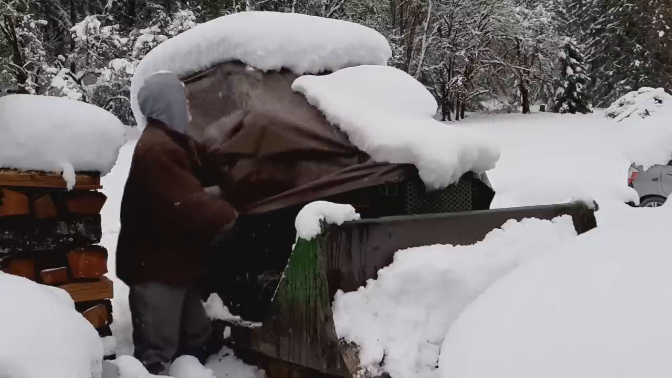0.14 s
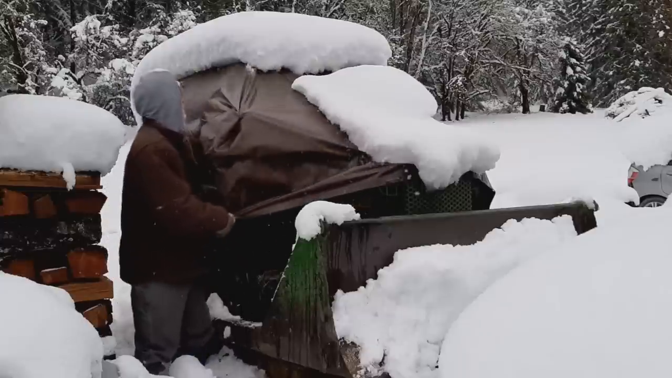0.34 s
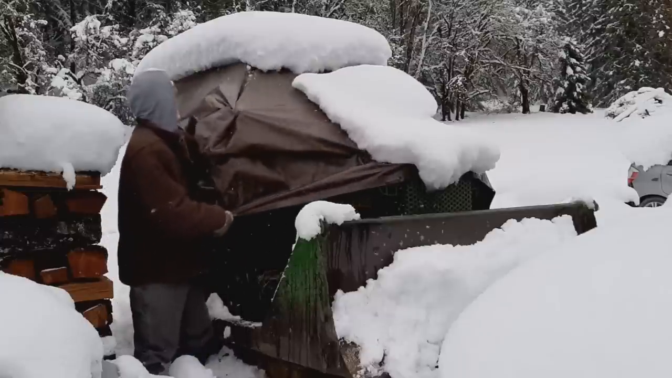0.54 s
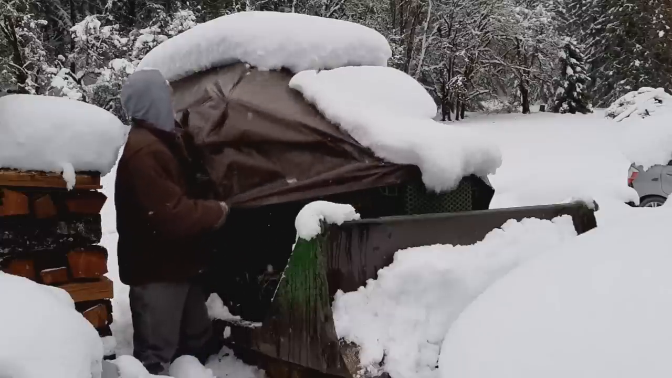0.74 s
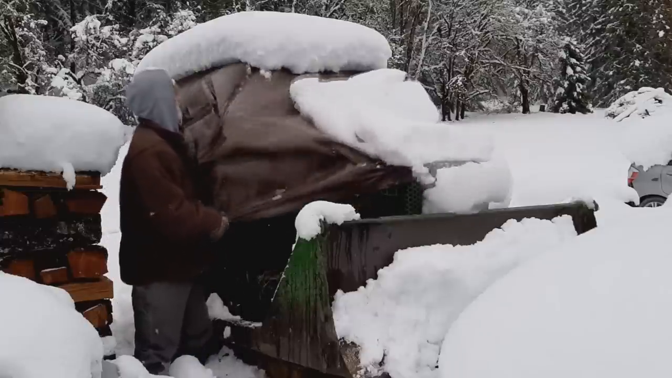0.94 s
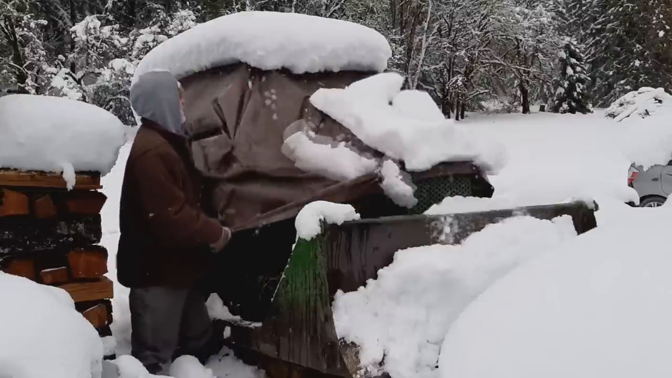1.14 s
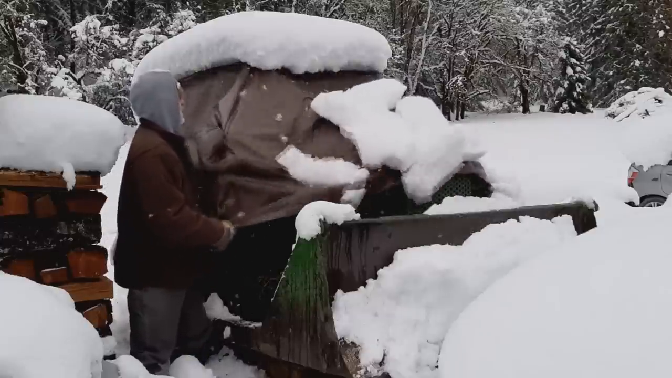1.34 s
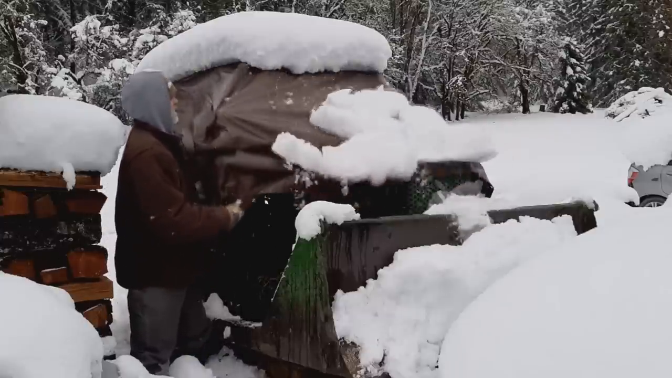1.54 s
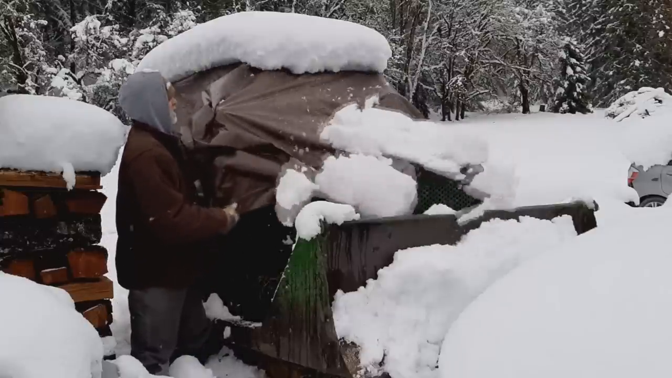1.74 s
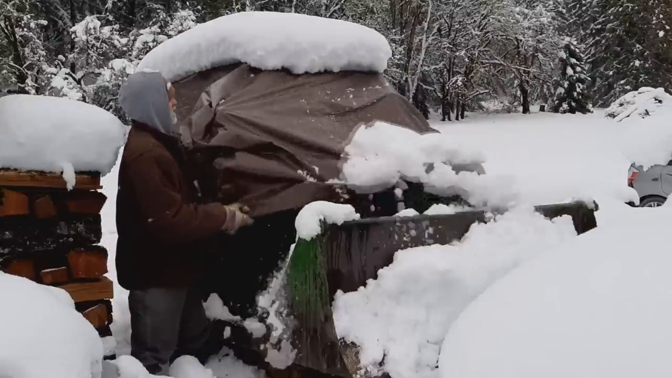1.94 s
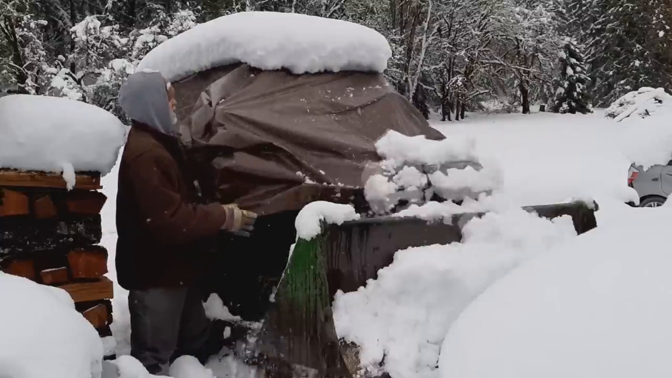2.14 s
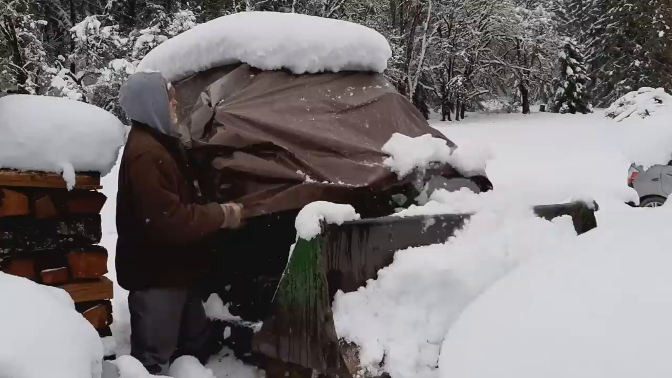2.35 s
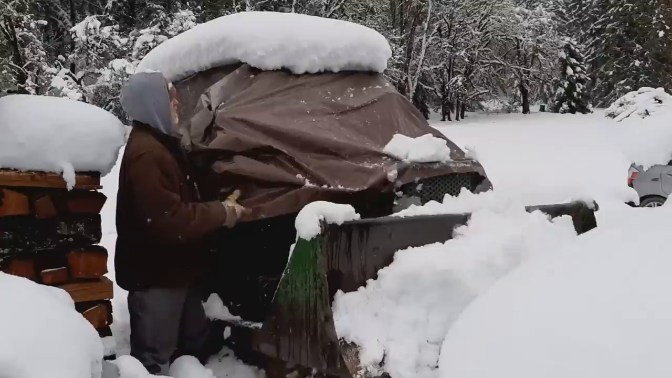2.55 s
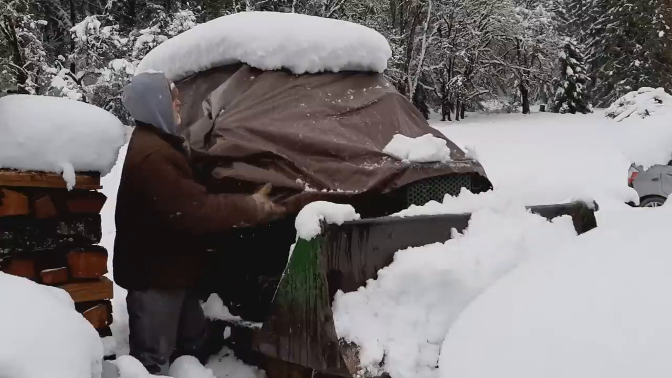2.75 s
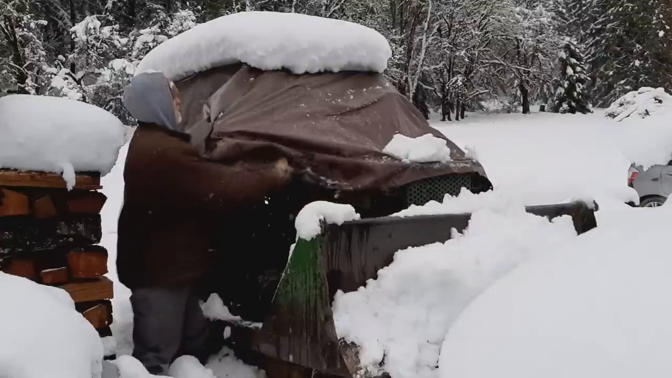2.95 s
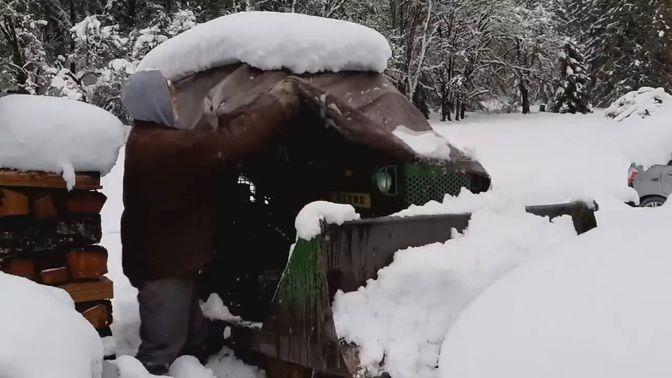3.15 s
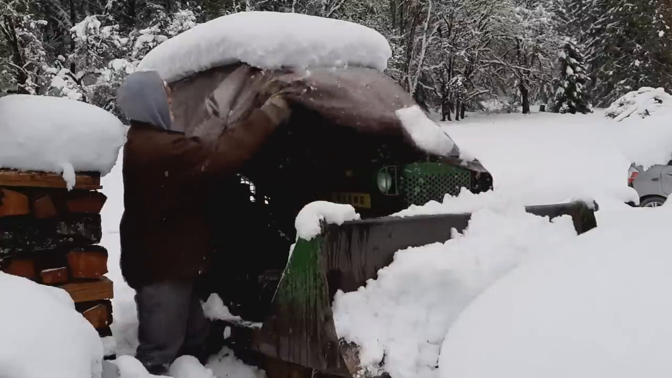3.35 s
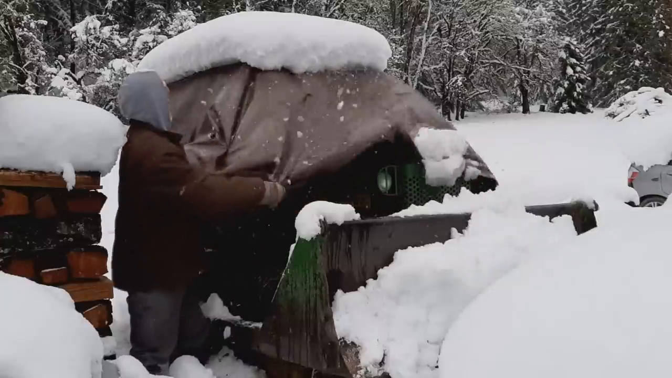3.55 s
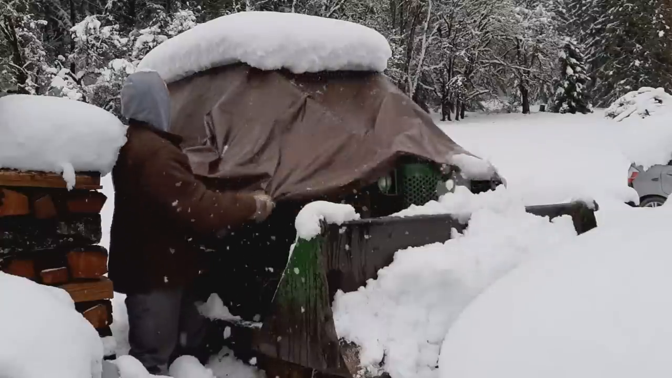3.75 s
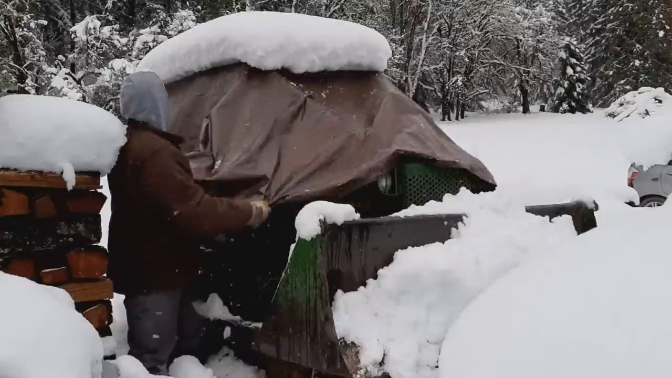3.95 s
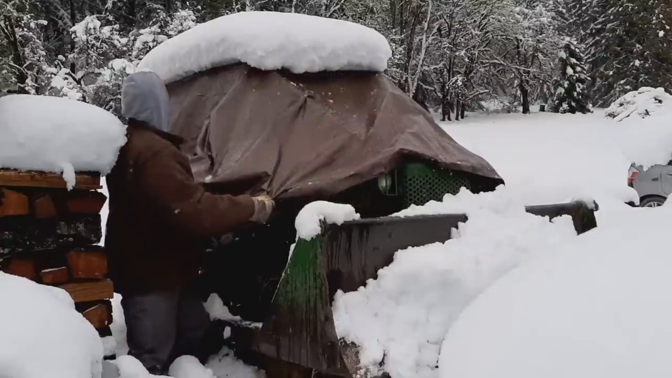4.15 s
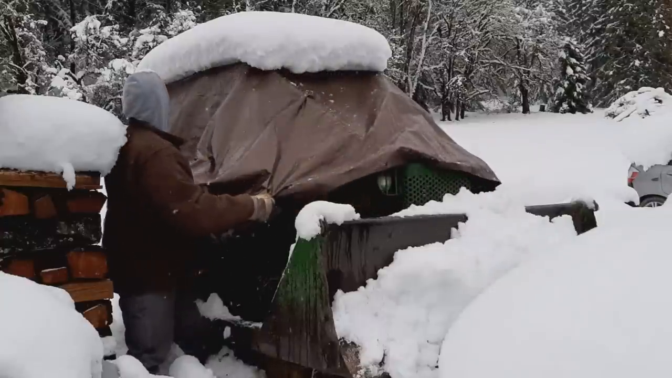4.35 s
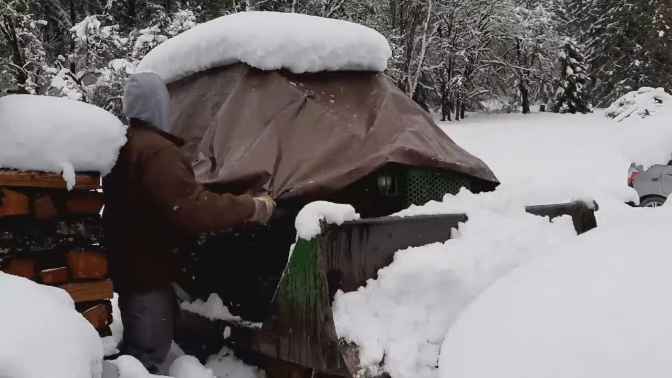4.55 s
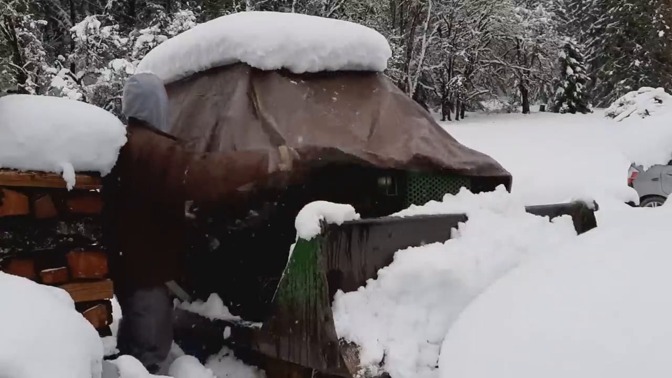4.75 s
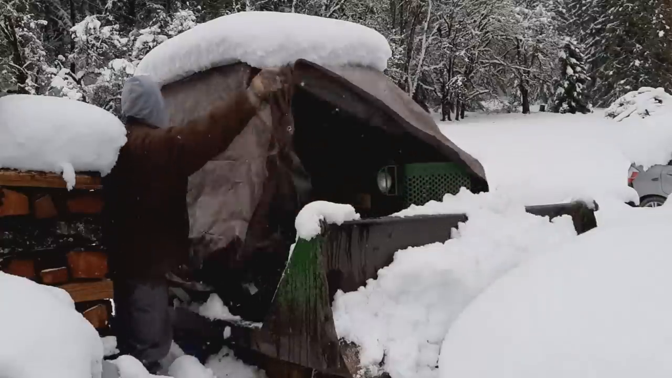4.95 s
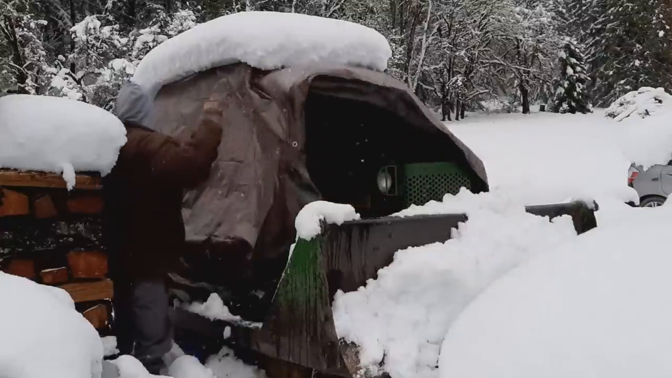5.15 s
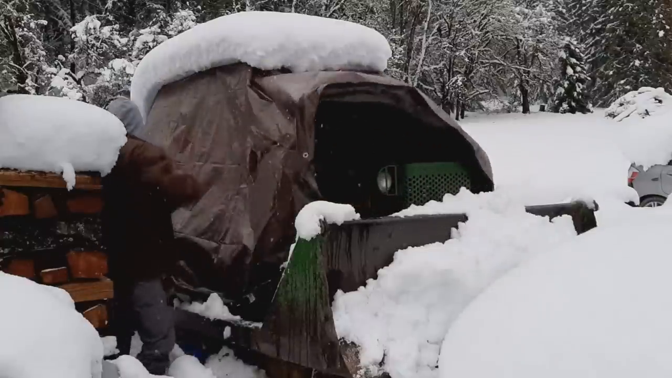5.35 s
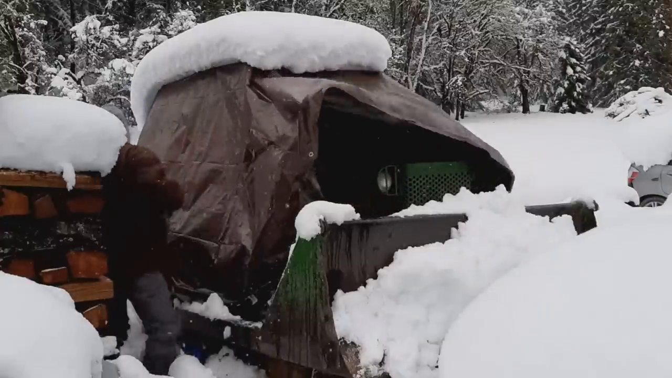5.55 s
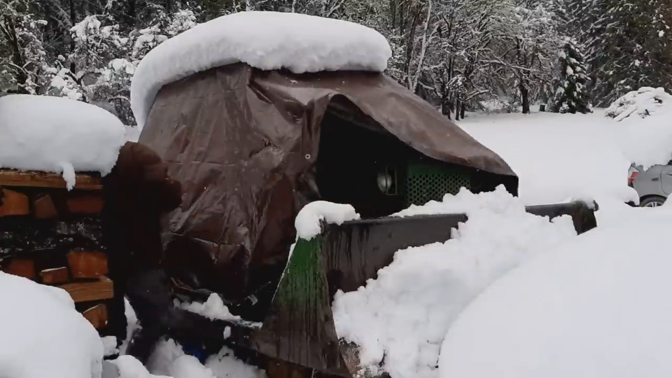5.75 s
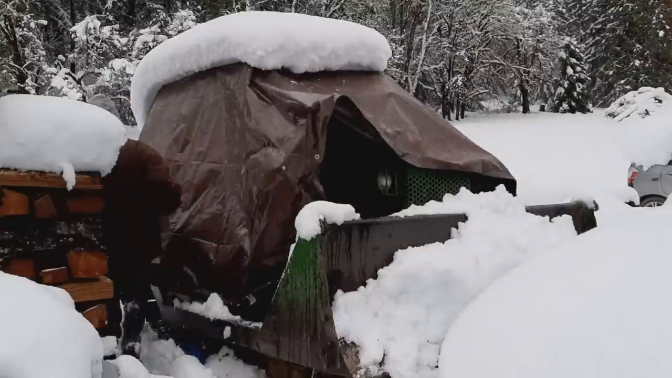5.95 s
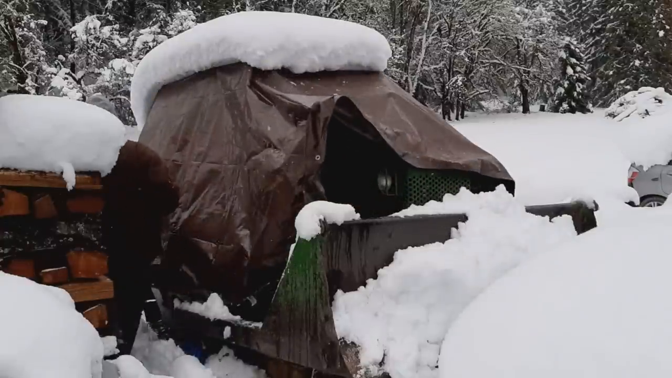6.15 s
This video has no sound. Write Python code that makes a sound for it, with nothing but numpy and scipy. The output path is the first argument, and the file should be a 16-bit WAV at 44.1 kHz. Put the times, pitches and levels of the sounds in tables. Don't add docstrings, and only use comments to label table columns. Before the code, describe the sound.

Outdoors in a hushed, snow-deadened yard, a stiff plastic tarp is handled close to a stereo microphone. From 0 to 0.4 seconds, strong tugs make dense, rough crinkling with bright snaps and low puffs of air. It dips briefly around 0.5 to 0.75, then a sudden pull starts a sustained rustle with uneven surges and hissing, sliding snow until about 1.7. This thins to slack ticks and a soft slump, nearly silent from 2.4 to 2.7, with small crinkles after. At 3.0 the pulling returns: big folds flap and billow with low air thumps, peaking near 3.7 in a loud, deep pop. Rustling loosens, with a sharp pop at 4.0, and fades by 4.6. A fresh drag bursts in around 4.8 to 5.1, then decays; soft snow lumps land faintly near 5.6 and sparse, quiet crinkles continue to the end, just past 6 seconds.

```python
import sys
import numpy as np
from scipy import signal
from scipy.fft import rfft, irfft, next_fast_len
from scipy.io import wavfile
from scipy.ndimage import uniform_filter1d

SR = 44100
rng = np.random.default_rng(int(sys.argv[2]) if len(sys.argv) > 2 else 0)


def ratio(d):
    e = np.asarray(d, float) / 20
    return 10 ** e


def digitize_waveform(pressure):
    field = np.atleast_2d(pressure).T
    bounded = np.clip(field, -1, 1)
    quanta = np.round(bounded * 32767).astype(np.int16)
    wavfile.write(sys.argv[1], SR, quanta)


N = 272967


def evened(x):
    return x / np.sqrt(np.mean(x ** 2) + 1e-20)


def read_spectrum(points, hz):
    f, value = np.transpose(points)
    return np.interp(np.log(hz + 1), np.log(f + 1), value)


# frequency in Hz, density in dB per Hz.
COLOUR = [(28, -55), (45, -13.5), (64, -10), (127, -4.5), (189, -9.5), (600, -4), (1500, -3.5), (2260, -5),
          (3650, -5.5), (7600, -11.5), (8350, -24.5), (8750, -26.5), (11600, -21.5), (16000, -23)]
EDGE_HZ = 16020


def band(lo_hz, hi_hz):
    hz = abs(np.fft.fftfreq(8192, 1 / SR)) + 1
    slope = (1 + (lo_hz / hz) ** 6) * (1 + (hz / hi_hz) ** 6) * (1 + (hz / EDGE_HZ) ** 200)
    log_gain = np.log(ratio(read_spectrum(COLOUR, hz)) / np.sqrt(slope) + 1e-5)
    spectrum = np.exp(np.conj(signal.hilbert(log_gain)))
    taps = np.fft.ifft(spectrum).real[:4096]
    return taps / np.linalg.norm(taps)


def through_band(x, lo_hz, hi_hz):
    return signal.oaconvolve(x, band(lo_hz, hi_hz)[None])[:, :N]


LAG, LAG_SPREAD = 1.7, 2.9


def clicks(at, size, jitter):
    lag = np.round(LAG + LAG_SPREAD * jitter).astype(int)
    ports = [np.bincount(np.clip(place, 0, N - 1), size, N) for place in (at, at + lag)]
    return evened(np.array(ports))


def friction():
    return clicks(np.arange(N), rng.standard_normal(N), rng.standard_normal(N))


AIR_DB = -82


def air():
    return ratio(AIR_DB) * through_band(friction(), 900, 15900)


def buckles(per_s, spread_db):
    place, sign, size, a, b = rng.random((80000, 5))[:round(per_s * N / SR)].T
    strength = ratio(spread_db * np.minimum(-np.log(1 - size), 5.0))
    jitter = np.sqrt(6) * (a + b - 1)
    return clicks((place * N).astype(int), np.sign(sign - .5) * strength, jitter)


# time in seconds, effort in dB, sliding snow in dB, billow of large panels in dB.
DRAG = [(0, -38.5, -3, -1.5), (.4, -38, 1.5, 1), (.47, -47.5, 3, 1), (.745, -53, 7.5, 1.5),
        (.77, -40.5, 5.5, 2), (1.6, -39, 4, -0.5), (2.1, -45, 7, 0.5), (2.39, -57.5, 9, 3),
        (2.46, -65, 11, -10), (2.66, -69.5, 13, -8), (2.95, -58.5, -3, -1), (3.2, -35, -9, 0),
        (3.8, -40, 5, -1), (4.3, -49, 7.5, -5.5), (4.66, -61.5, 5, -4.5), (4.832, -35, -3, -1),
        (5.52, -58.5, 4, -3.5), (6.19, -69, -5, -5)]
# peak time in seconds, effort in dB, rise in
# seconds per 10 dB, fall in seconds per 10 dB, tautness in dB.
MOVES = [(.105, -31.5, -0.15, 0.0155, 2.5), (0.261, -29, 0.18, 0.0348, -1), (.379, -41, 0.7, -0.11, 3.5),
         (.85, -44.5, -0.14, 0.21, 2.5), (.97, -47, 0.06, -0.01, -10), (1.122, -37, 0.04, 0.01, 1),
         (1.2, -42, 0.07, 0.01, 5), (1.287, -35, 0.11, 0.12, 0.5), (1.53, -33.5, -0.0847, 0.0744, 0.5),
         (3.01, -47.5, 0.05, 0.13, -1), (3.09, -34, 0.0345, -0.15, 0.5), (3.242, -31, 0.06, 0.1341, 4.5),
         (3.432, -33, 0.1456, -0.13, -0.5), (3.58, -32.5, 0.0566, 0.03, 9.5), (3.641, -37.5, 0.0644, 0, 7),
         (3.713, -23, 0.0471, 0.0143, -1), (3.76, -34.5, 0.03, 0.0928, -0.5),
         (3.118, -35, -0.0037, -0.5, -0.5), (4.951, -35.5, 0, 0.22, 1.5), (5.076, -36.5, -0.08, 0.0757, -14),
         (.53, -49, -0.5, 0.05, -1), (0.691, -44, 0.06, 0.04, 3.5), (2.078, -46, -0.1, 0.2, 1),
          (2.33, -61, -2, 0, 4), (2.5, -61, 0.26, 0.15, 8), (2.705, -57, -0.3, 0, -5),
          (2.96, -56, -0.1, -1, -4), (4.575, -62, .05, .03, 11), (2.764, -51, 0.08, 0.12, -4.5),
          (2.854, -54, -0.08, .06, -2), (4.011, -48.5, 0.16, 0.4, 4), (4.289, -44, -0.47, .06, -11),
          (4.391, -52.5, -0.7, 0.14, -9), (5.25, -47, 0.02, 0.17, -5.5), (5.47, -52.5, 0, 0, 0.5),
          (5.702, -52.5, 0.07, .12, -0.5), (5.8, -57.5, 0.08, .08, 0), (5.96, -55, .04, .04, 1),
          (6.03, -56, 0.16, -0.7, -4), (6.09, -51.5, .06, 0.15, 1.5), (6.13, -51, .04, -0.7, -5)]
# level in dB, then dB per dB of effort, of snow, of billow, of tautness.
FOLLOW = [
    (0, 1, -0.046, 0.053, 0.068),
    (-9, 0.9, -.1, 1.08, -0.46),
    (0, 1.0455, 0.24, 0, 1),
    (-8, 0.99, 0.99, 0.11, 1),
    (-22, 1.3, .05, 0.024, .1),
    (-13.5, 1.07, 0.28, 1.2, 0.013),
]
MIDDLE_DB = -40
ROUND_DB = 0.97


def follow():
    t = np.arange(0, N + 64, 64) / SR
    s, *drag = np.transpose(DRAG)
    effort, snow, billow = (np.interp(t, s, column) for column in drag)
    at, peak, rise, fall, taut = np.transpose(MOVES)[:, :, None]
    rising = (at - t) / np.maximum(rise, .005)
    falling = (t - at) / np.maximum(fall, .005)
    fade = 10 * np.where(t < at, rising, falling)
    fade = np.hypot(fade, ROUND_DB) - abs(ROUND_DB)
    levels = []
    for db, by_effort, by_snow, by_billow, by_taut in FOLLOW:
        steady = by_effort * (effort - MIDDLE_DB) + by_snow * snow
        tugs = by_effort * (peak - fade - MIDDLE_DB) + by_taut * taut
        total = 10 * np.log10(ratio(2 * steady) + ratio(2 * tugs).sum(0)) + by_billow * billow
        levels.append(np.interp(np.arange(N) / SR, t, MIDDLE_DB + db + total))
    return levels


# time in seconds, level in dB, length in seconds per 10 dB.
PUFFS = [(0.135, -47, 0.13), (0.235, -47, 0.07), (0.36, -49.5, 0.1), (0.672, -60, .04), (0.824, -52, 0.1),
         (0.93, -49, 0.07), (1.223, -50, 0.18), (1.417, -53, 0.2), (1.643, -49, 0.2), (2.1, -59, 0.12),
         (3.07, -65, .05), (3.23, -39, 0), (3.455, -43, -0.04), (3.548, -40, 0), (3.693, -41.5, 0.06),
         (3.84, -52, -0.12), (4.86, -54, -0.04), (4.974, -48.5, 0.1), (5.6, -55, .07), (6.1, -67, -0.9)]
RUMBLE_DB, PUFF_TOP_DB = -78, 0.5


def boom():
    t = np.arange(N) / SR
    puffs = ratio(2 * RUMBLE_DB)
    for s, db, length in PUFFS:
        puffs = puffs + ratio(2 * db - 20 * abs(t - s) / max(length, .01))
    deep, upper = follow()[-2:]
    deep_db = 10 * np.log10(ratio(2 * deep) + puffs)
    upper_db = 10 * np.log10(ratio(2 * upper) + puffs * ratio(2 * PUFF_TOP_DB))
    push = buckles(700, 2.2) + 0.055 * rng.standard_normal((2, N))
    deep_air = through_band(push * ratio(deep_db + 1.3), 42, 130)
    upper_air = through_band(push * ratio(upper_db + 0.5), 130, 270)
    return deep_air + upper_air


# start in seconds, frequency in Hz,
# peak level in dB, length in cycles.
THUDS = [
    (3.700, 66, -32, 2.6),
    (3.706, 190, -29, 2.4),
    (3.69, 520, -28, 2),
    (2.33, 300, -52, 3),
    (4.0091, 950, -24, 1.4),
    (5.551, 140, -54, 1.3),
    (5.565, 190, -52, 1.3),
    (5.575, 105, -52, 2.5),
    (5.63, 130, -55, 3),
]


def thuds():
    out = np.zeros(N)
    for s, hz, db, cycles in THUDS:
        turns = np.arange(0, cycles, hz / SR)
        swell = np.sin(np.pi * turns / cycles)
        at = round(s * SR)
        out[at:at + len(turns)] -= ratio(db) * np.sin(2 * np.pi * turns) * swell
    return out


CRACKLE_PER_S = 30
CRACKLE_DB, CRACKLE_SPREAD_DB = -8, 2.5
CRACKLE_TILT_DB, CRACKLE_NEEDLE_DB = -1.5, -11.5


def crackle():
    when, size, tone, top = rng.random((round(CRACKLE_PER_S * N / SR), 4)).T
    s = .01 + when * (N / SR - .02)
    pull_db = follow()[0][(s * SR).astype(int)]
    db = pull_db + CRACKLE_DB + CRACKLE_SPREAD_DB * np.minimum(-np.log(1 - size), 2)
    tilt_db = CRACKLE_TILT_DB + 12 * (tone - .5)
    needle_db = db + CRACKLE_NEEDLE_DB + 16 * (top - .5)
    return list(zip(s, db, tilt_db, needle_db))


# time in seconds, strength in dB,
# brightness in dB per octave, level of the needle in the top band in dB.
SNAPS = [(0.0852, -35, -4, -46), (0.0945, -33, 6, -42), (0.1062, -37, -2, -44), (.206, -49, 0, -46),
         (.2275, -38, -8, -49), (0.2596, -34, 1.5, -35), (.376, -42, 11, -35), (0.4062, -35.5, 1, -37),
         (0.7616, -35, -1, -33), (0.786, -33.5, 0, -46), (0.812, -35, 0, -50.5), (0.9967, -40, 9, -42.5),
         (1.1888, -42, 5, -53), (1.203, -54, 1.5, -60), (1.2371, -43, 8, -47), (1.296, -45, -5, -40.5),
         (3.005, -36, -2.5, -34), (3.0856, -45, -2, -44), (3.1358, -34.5, 2, -41), (3.1983, -36, 1, -52),
         (3.2635, -38, -1.5, -46), (3.5425, -32.5, -6.5, -58), (3.6621, -31, 4, -40), (3.667, -29, -3, -38),
         (4.7857, -38, -3, -65), (4.8434, -35, 0, -54), (4.913, -36, 1, -54), (5.044, -37, -5.5, -45),
         (5.0706, -32.5, 0, -55), (5.1354, -51, 2, -47),
         (.4779, -40.5, 0, -47), (.6869, -43.5, 4, -43.5), (.6949, -42, 2, -51), (1.6638, -40.5, -4, -52.5),
         (2.052, -45, 8, -38.5), (2.3163, -50.5, -2, -53), (2.5999, -61, 13.5, -44), (2.702, -51, -6, -78),
         (2.7475, -62, -5, -80), (2.7614, -55, 7, -44), (2.7818, -53, -4, -72), (2.821, -56, -1, -71),
         (2.9322, -55, 0, -76), (2.9654, -63, -12, -68), (2.9999, -42.5, 0, -49), (3.8676, -68, -4, -56),
         (4.0504, -46, 8, -52), (4.3221, -44, 0, -62), (4.3887, -44, -1, -44), (4.5613, -62, 18, -45),
         (4.6924, -55.5, -4, -75), (4.7064, -50, -1, -82), (4.7326, -55, -8, -74), (5.2115, -52, -3, -63),
         (5.3838, -50, 1, -55), (5.5344, -49, 4, -58), (5.5431, -53, -9, -69), (5.6032, -55, 7, -59),
         (5.725, -54.5, -5.5, -66), (6.0982, -52, 9.5, -71)]
# low edge in Hz, high edge in Hz, trim in dB.
SNAP_BANDS = [(700, 2500, 1.0), (2500, 5000, 1.5), (5000, 8200, 3.0), (8700, 15900, 6.0)]
CREASE_HZ = 3300


def snaps(fade_s=.001, lead=2.0):
    size = 512
    t, hz = np.arange(size) / SR, np.fft.rfftfreq(size, 1 / SR)
    creases = SNAPS + crackle()
    splinters = rng.standard_normal((len(creases), size)) * np.exp(-t / fade_s)
    splinters[:, 0] = lead * np.sign(splinters[:, 0])
    timing = np.exp(1j * np.angle(rfft(splinters)))
    octaves = np.log2([np.sqrt(lo * hi) / CREASE_HZ for lo, hi, _ in SNAP_BANDS[:-1]])
    out = np.zeros((2, N + 2 * size))
    for (s, peak_db, tilt_db, needle_db), phase in zip(creases, timing):
        levels = [*(peak_db + tilt_db * octaves), needle_db]
        colour = [(200, -120), (16100, -140)]
        for (lo, hi, trim_db), level_db in zip(SNAP_BANDS, levels):
            density_db = level_db + trim_db + 10 * np.log10(50 * SR / (hi - lo))
            colour += [(lo * 1.1, density_db), (hi / 1.05, density_db)]
        snap = np.roll(irfft(ratio(read_spectrum(sorted(colour), hz)) * phase), 64)
        for port in (0, 1):
            at = round(s * SR) - 60 + port * round(LAG)
            out[port, at:at + size] += snap
    return out[:, :N]


def clumps(per_s=70.0, fade_s=0.004, drift_s=0.01, pull_s=0.095):
    step = 32
    fire, size, noise = rng.random((3, N // step + 2))
    starts = size * (fire < per_s * step / SR)
    slides = signal.lfilter([1], [1, -np.exp(-step / (fade_s * SR))], starts)
    wander = uniform_filter1d(noise - .5, max(round(drift_s * SR / step), 1))
    both = evened(slides - slides.mean()) + 0.26 * evened(wander)
    both = both - uniform_filter1d(both, round(pull_s * SR / step))
    return np.interp(np.arange(N) / step, np.arange(len(both)), evened(both))


# low edge in Hz, high edge in Hz, buckles per second, size spread in dB,
# share of sheet-wide buckles from 0 to 1, clumping in dB, smooth friction from 0 to 1, trim in dB.
LAYERS = [
    (652, 3020, 5000, 2, 0.29, 1.24, 0.48, -0.11),
    (247, 830, 2500, 2, 0.44, 1.63, 0.24, 2),
    (2600, 8400, 9000, 1, 0.3, 1.7, 0.72, 0.2),
    (9260, 14100, 7000, 5.5, 0.5, 1.5, 0.71, 1.5),
]


def sheet():
    levels = follow()
    sparse = np.clip(1.1 - .015 * (levels[0] + 42), .9, 1.35)
    wide, avalanche, rub, out = buckles(3000, 2.0), clumps(), friction(), snaps()
    for (lo, hi, per_s, spread_db, share, clump_db, smooth, trim_db), db in zip(LAYERS, levels):
        share, smooth = np.clip([share, smooth], 0, 1)
        grains = share * wide + np.sqrt(1 - share ** 2) * buckles(per_s, spread_db)
        drive = np.sqrt(1 - smooth ** 2) * grains + smooth * rub
        bursts = 0.52 * avalanche + 0.5 * clumps()
        drive = evened(drive * ratio(clump_db * sparse * bursts))
        out = out + through_band(drive * ratio(db + trim_db), lo, hi)
    return out


def yard(x, wet_db=-12.0, fade_s=.009, turn_s=.35):
    t, wet = np.arange(2500) / SR, 0
    for k in range(6):
        taps = rng.standard_normal((2, len(t))) * np.exp(-t / fade_s) * (t > .001)
        taps = taps[0] + 0.53 * np.array([taps[1], -taps[1]])
        taps = taps / np.linalg.norm(taps[0])
        turn = (np.arange(N) / SR / turn_s * 6 - k) % 6 - 1
        window = np.cos(np.pi / 2 * np.clip(turn, -1, 1))
        wet = wet + signal.oaconvolve(x * window, taps, axes=1)[:, :N]
    return (x + ratio(wet_db) * wet) / np.sqrt(1 + ratio(2 * wet_db))


def scene():
    return yard(sheet()) + boom() + thuds() + air()


def band_limit(x):
    return signal.sosfilt(signal.butter(12, 16830, fs=SR, output="sos"), x)


# frequency in Hz, width in Hz, level in dB.
HOUSING = [(1535, 130, -4.0), (2035, 50, -3.0)]
# frequency in Hz, left-right difference in dB.
LEAN = [(60, 0), (240, -0.5), (950, 0), (3770, -1.5), (15000, 0.5)]


def record(dry):
    x = dry.copy()
    for hz, width_hz, db in HOUSING:
        x += ratio(db) * signal.lfilter(*signal.iirpeak(hz, hz / width_hz, SR), dry)
    size = next_fast_len(N)
    lean = read_spectrum(LEAN, np.fft.rfftfreq(size, 1 / SR)) / 2
    x = irfft(rfft(x, size) * ratio(np.array([lean, -lean])), size)[:, :N]
    return band_limit(x)


dry = scene()
out = record(dry)
digitize_waveform(out)
```